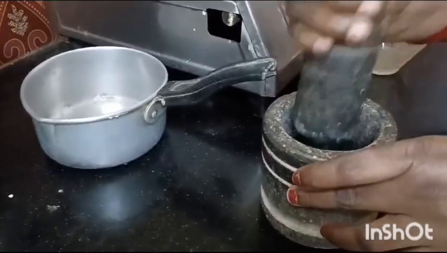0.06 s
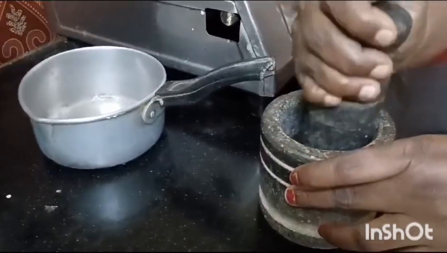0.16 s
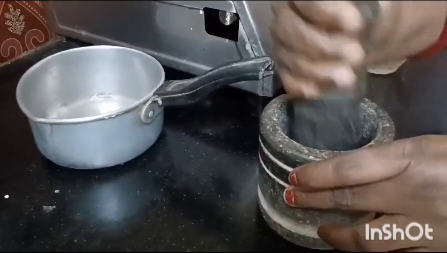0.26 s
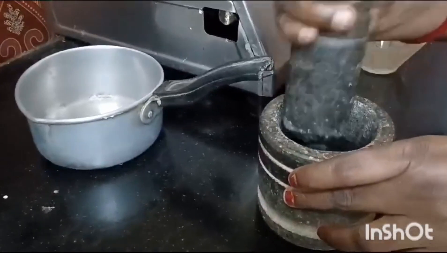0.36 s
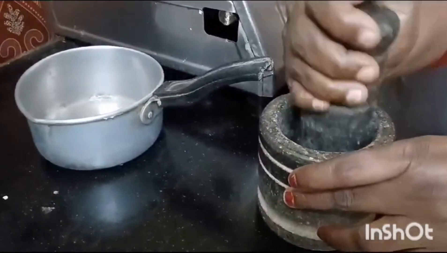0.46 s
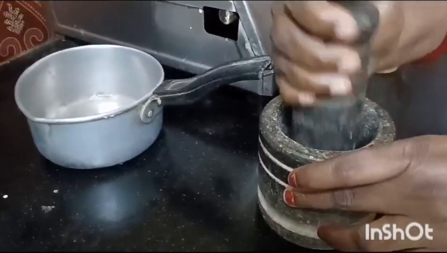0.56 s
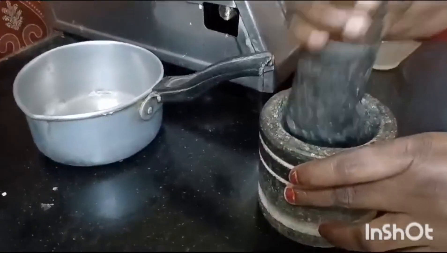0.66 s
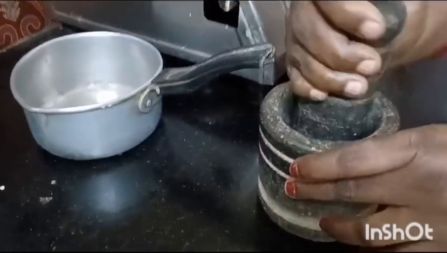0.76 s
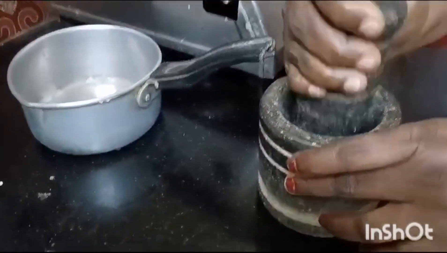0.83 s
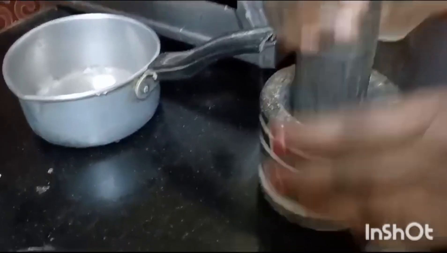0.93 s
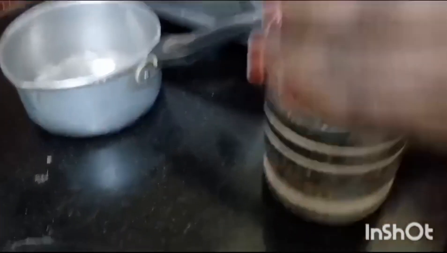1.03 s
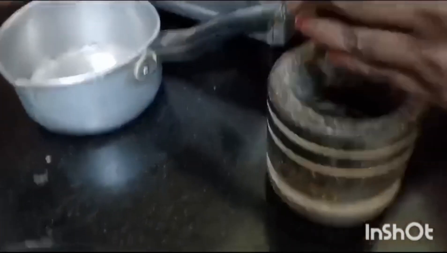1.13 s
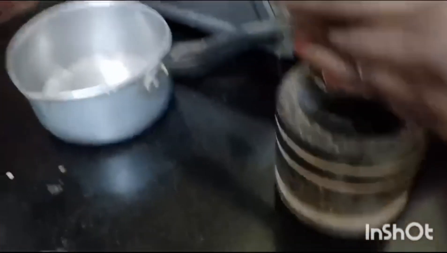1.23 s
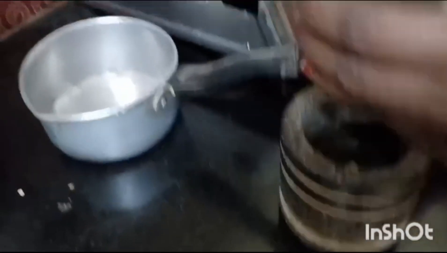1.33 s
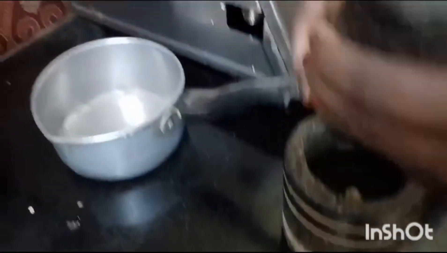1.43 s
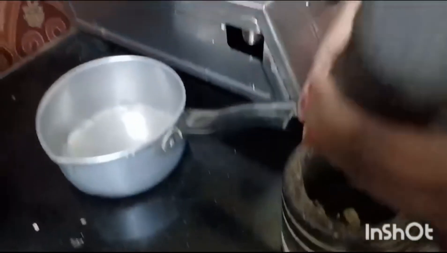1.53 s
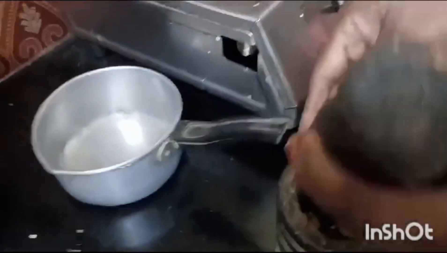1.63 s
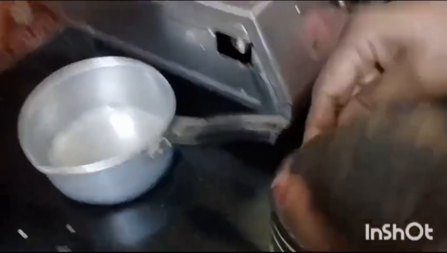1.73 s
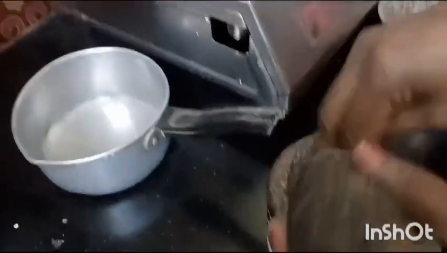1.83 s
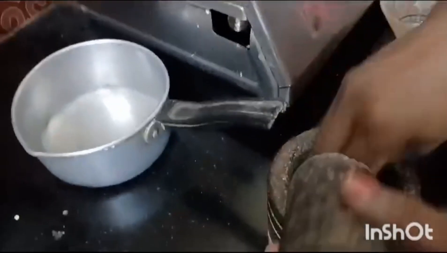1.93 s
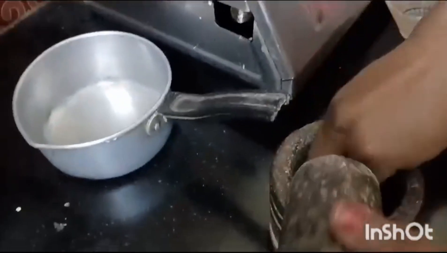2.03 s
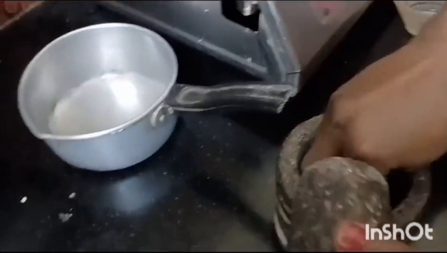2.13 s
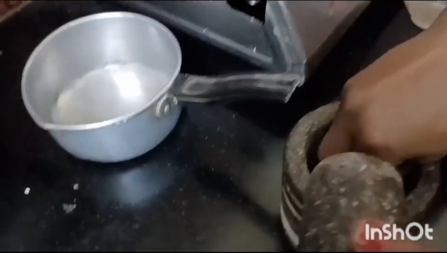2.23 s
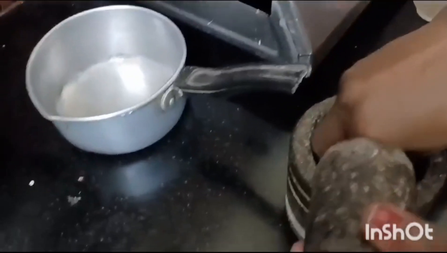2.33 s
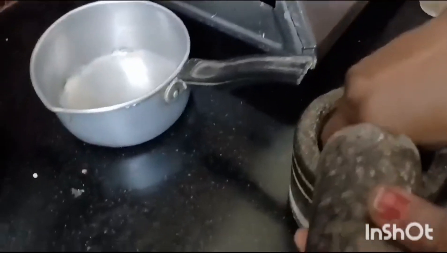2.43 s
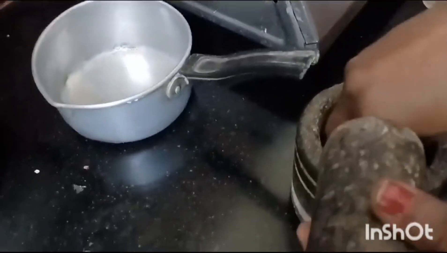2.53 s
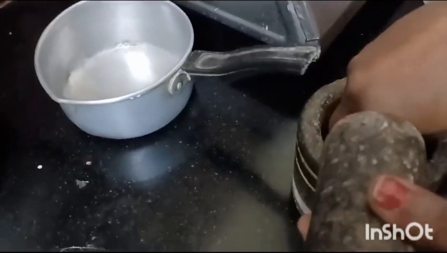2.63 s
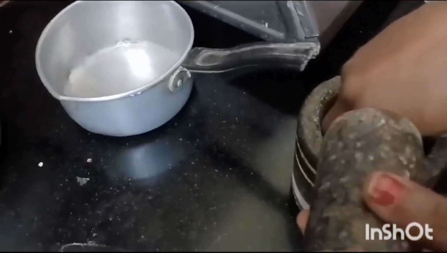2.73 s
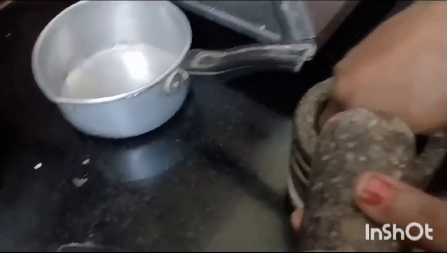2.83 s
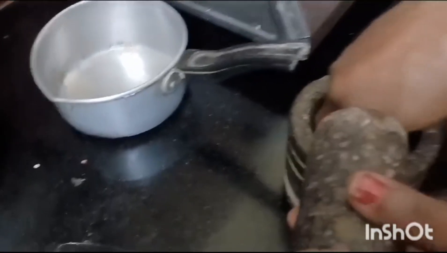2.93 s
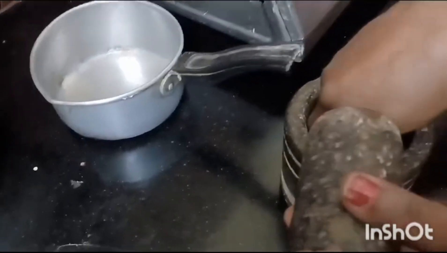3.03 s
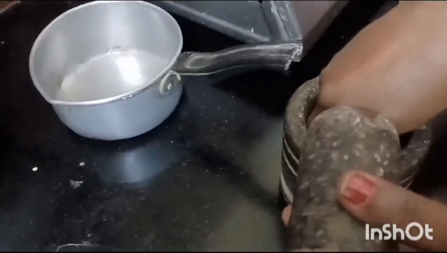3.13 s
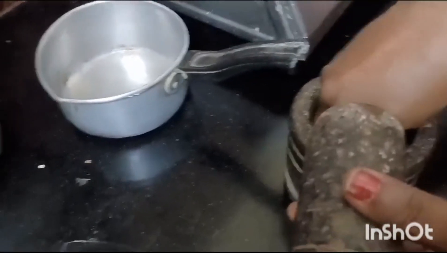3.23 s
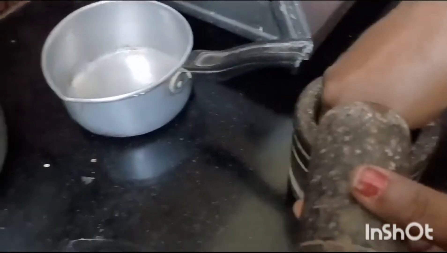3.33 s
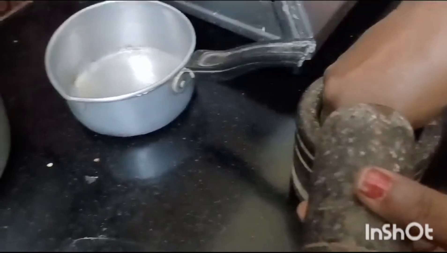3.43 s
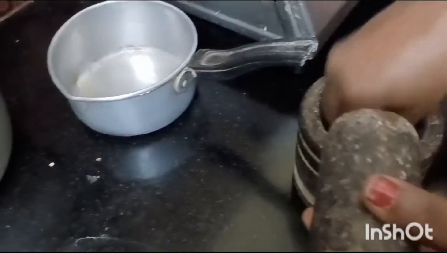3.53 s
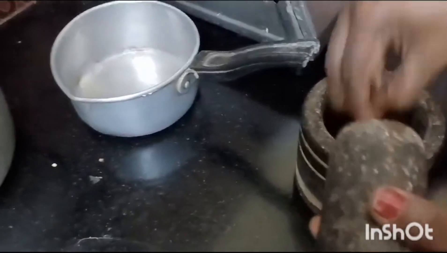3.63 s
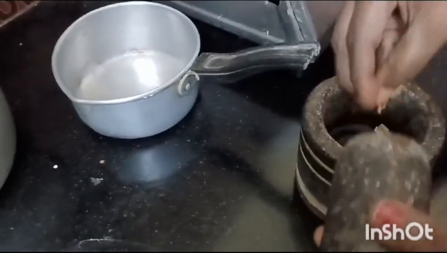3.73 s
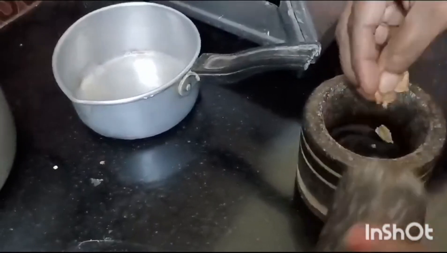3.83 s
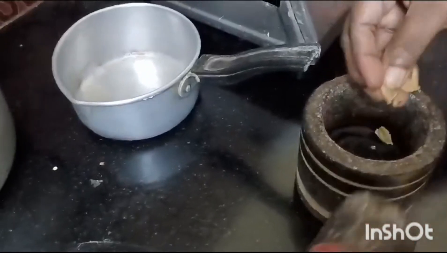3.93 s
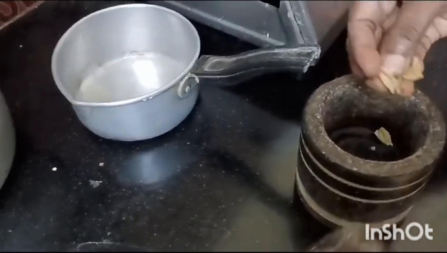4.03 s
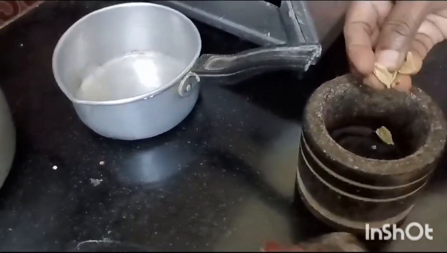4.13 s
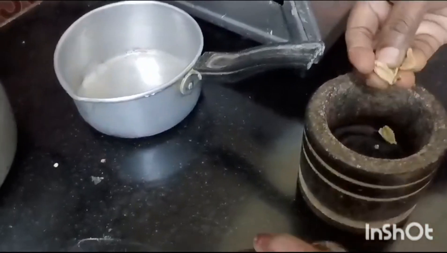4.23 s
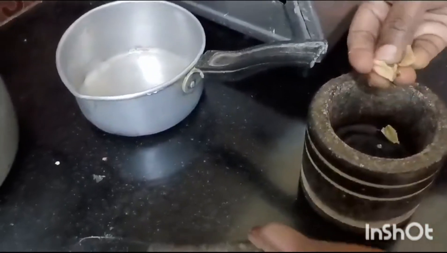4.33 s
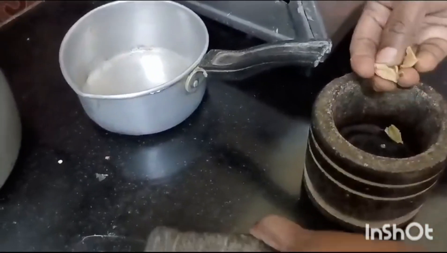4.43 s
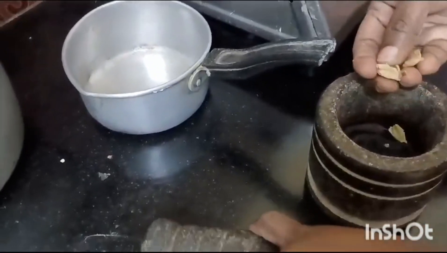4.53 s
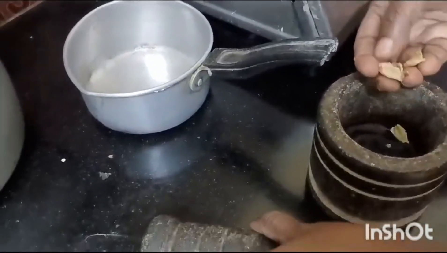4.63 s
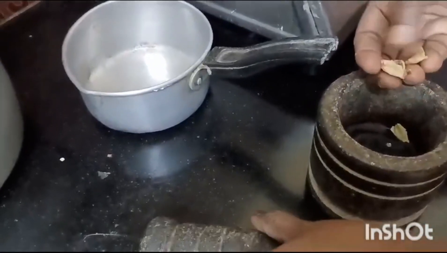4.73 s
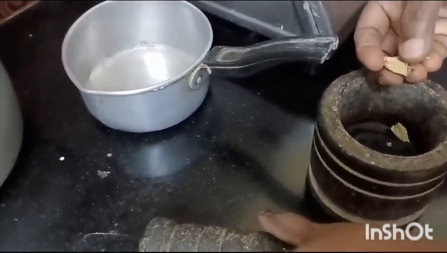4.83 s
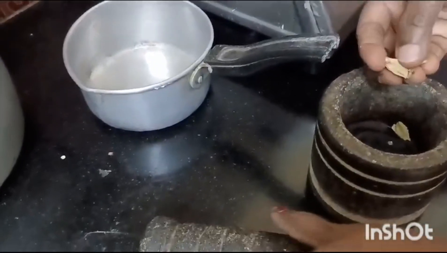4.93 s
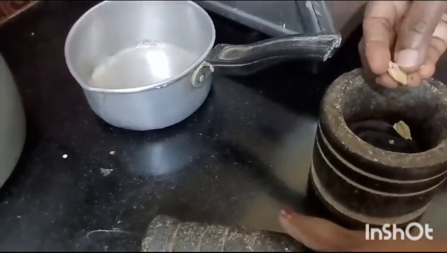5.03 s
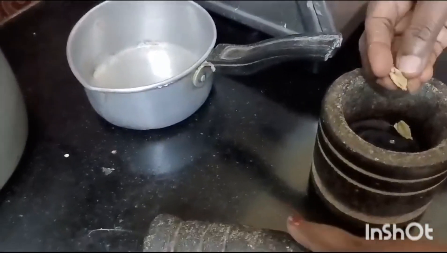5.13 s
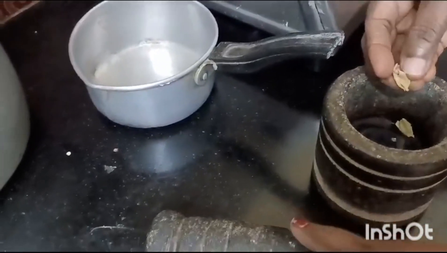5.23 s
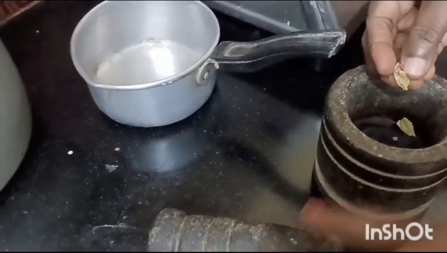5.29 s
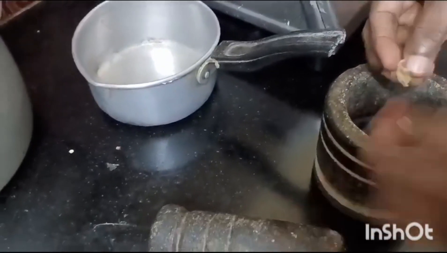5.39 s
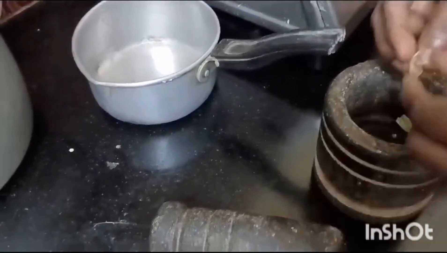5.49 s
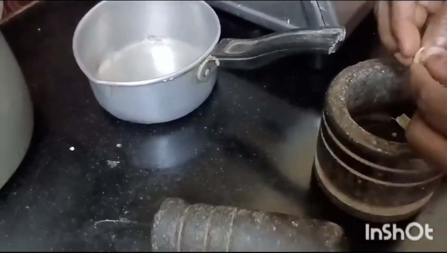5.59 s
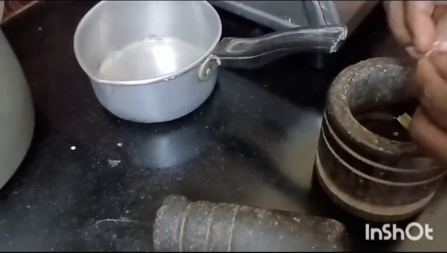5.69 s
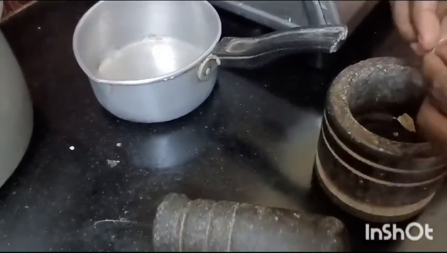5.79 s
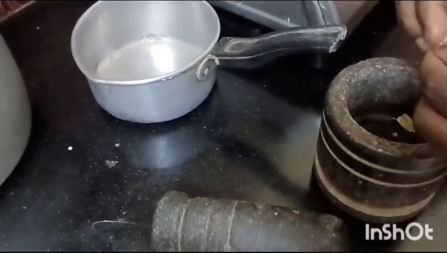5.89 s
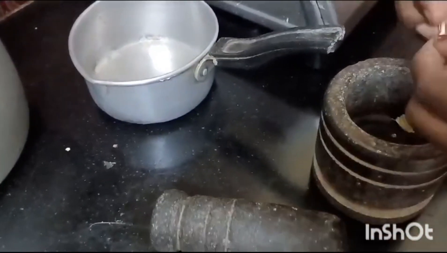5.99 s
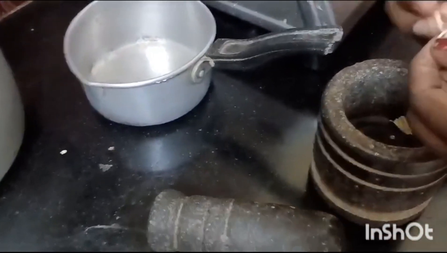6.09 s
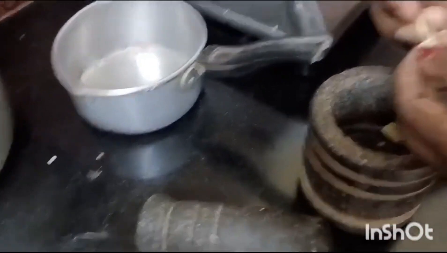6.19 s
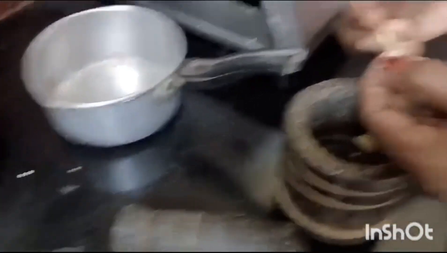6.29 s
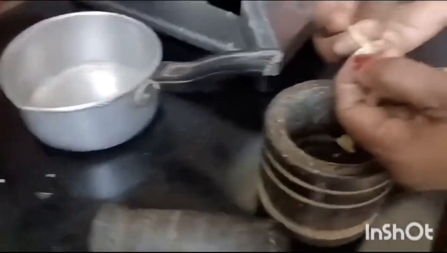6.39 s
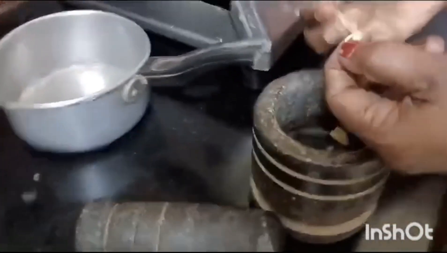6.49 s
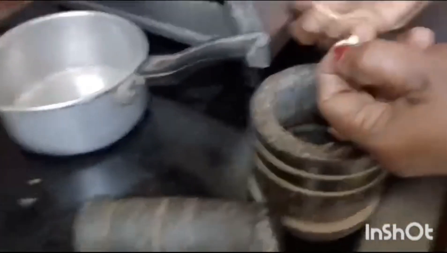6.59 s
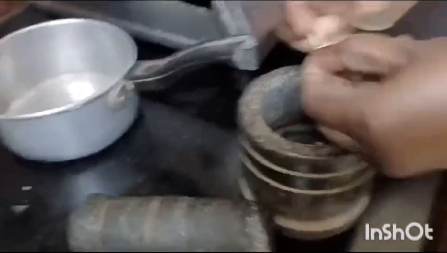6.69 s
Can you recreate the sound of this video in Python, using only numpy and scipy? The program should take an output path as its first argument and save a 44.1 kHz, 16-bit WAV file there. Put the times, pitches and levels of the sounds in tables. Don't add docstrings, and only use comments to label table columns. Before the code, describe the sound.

Three hard stone pestle blows ring in a bare kitchen with a singing metal pan, then dry rustling, bangle clinks and a pestle clacking down.

```python
import sys
import numpy as np
from scipy import signal
from scipy.io import wavfile
from scipy.ndimage import uniform_filter1d

SR = 44100
rng = np.random.default_rng(int(sys.argv[2]) if len(sys.argv) > 2 else 0)


def persist_wave(psi):
    counts = np.round(np.clip(psi, -1, 1) * 32767).astype(np.int16)
    wavfile.write(sys.argv[1], SR, np.atleast_2d(counts).T)


def ratio_of_db(decibels):
    return 10 ** (np.asarray(decibels, float) / 20)


N = 297675
LEAD = SR // 4
BAND_EDGES_HZ = 36 * 2 ** np.arange(0, 9.1, 1 / 3)


def rms_one(x):
    return x / np.sqrt(np.mean(x ** 2) + 1e-30)


def at_hz(points, hz):
    table_hz, value = np.array(points)[:, 0], np.array(points)[:, 1]
    return np.interp(np.log(hz), np.log(table_hz), value)


def cut(x, hz, kind, order):
    sos = signal.butter(order, np.clip(hz, 20, 18000), kind, fs=SR, output="sos")
    return signal.sosfilt(sos, x)


def clicks(times, sizes):
    out = np.full(N + LEAD, 1e-18)
    np.add.at(out, np.round(np.asarray(times) * SR).astype(int) + LEAD, sizes)
    return out


def ring(x, hz, t60):
    r, w = ratio_of_db(-60 / (t60 * SR)), 2 * np.pi * hz / SR
    return signal.lfilter([0, np.sin(w)], [1, -2 * r * np.cos(w), r * r], x)


def struck(events, modes, hold=1, swell_s=1e-4):
    s, db = np.array(events)[:, 0], np.array(events)[:, 1]
    luck_db, out = 2 * rng.standard_normal((len(s), len(modes))), 0
    for k, (hz, level_db, t60) in enumerate(modes):
        hit = clicks(s, ratio_of_db(db + level_db + luck_db[:, k]))
        mode = ring(hit, hz, t60 * hold)
        if swell_s > .001:
            mode = mode - ring(hit, hz, swell_s)
        out = out + mode * (-1) ** k
    return out


def contacts(events):
    out, luck = np.zeros(N + LEAD), rng.random((len(events), 2))
    for (s, db, hz), (wait, size) in zip(events, luck):
        tap = np.zeros(SR // 50)
        tap[0] = 1
        tap[40 + int(130 * wait)] = .25 * (2 * size - 1)
        at = round(s * SR) + LEAD
        out[at:at + len(tap)] += ratio_of_db(db) * cut(tap, hz, "low", order=2)[:len(out) - at]
    return out


def strokes(rows, rise_db_s, fall_db_s):
    t = (np.arange(N + LEAD) - LEAD) / SR
    out = 0
    for s, hold, db, *_ in rows:
        before, after = np.maximum(s - t, 0), np.maximum(t - s - hold, 0)
        out = out + ratio_of_db(db - rise_db_s * before - fall_db_s * after)
    return out


def whistle(hz, width_hz):
    sos = signal.butter(2, width_hz, fs=SR, output="sos")
    slow = signal.sosfilt(sos, rng.standard_normal((2, 2, N + LEAD)))
    phase = 2 * np.pi * np.cumsum(hz * np.ones(N + LEAD)) / SR
    return rms_one(slow[0] * np.cos(phase) + slow[1] * np.sin(phase))


# pitch_hz, likeness (0 to 1)
SIDE_LIKENESS = [(60, 0.35), (125, 1), (250, 0.59), (400, 0.49), (600, 0.31), (1000, 0.064), (4000, 0.51),
                 (12000, 0)]


def bands(size):
    white = rng.standard_normal((2, 2, size))
    centres = np.sqrt(BAND_EDGES_HZ[1:] * BAND_EDGES_HZ[:-1])
    out = np.empty((len(centres), 2, size))
    for k, hz in enumerate(centres):
        sos = signal.butter(2, BAND_EDGES_HZ[k:k + 2], "band", fs=SR, output="sos")
        mid, side = signal.sosfilt(sos, white[k % 2])
        alike = np.clip(at_hz(SIDE_LIKENESS, hz), 0, 1)
        out[k] = np.sqrt(1 + alike) * mid + np.sqrt(1 - alike) * side * np.array([[1], [-1]])
    return centres, out


# pitch_hz, left_minus_right_db
SIDE_LEAN = [(60, 1), (150, 2), (380, -1), (950, -0.5), (2380, 2), (5980, 5.5), (15000, -13)]


def coloured(bank, colour):
    centres, noise = bank
    lean_db = at_hz(SIDE_LEAN, centres)[:, None] * np.array([.5, -.5])
    return np.einsum("bc,bct->ct", ratio_of_db(at_hz(colour, centres)[:, None] + lean_db), noise)


# pitch_hz, t60_s
KITCHEN_DECAY = [(60, 2), (160, 1.5), (250, 1.1), (500, 1.1), (750, 1.254), (1100, 1.05), (2900, 0.68),
                 (7700, 0.17), (15000, 0.55)]


def kitchen():
    centres, noise = bands(SR * 3 // 2)
    t = np.arange(noise.shape[-1]) / SR
    decay = ratio_of_db(-60 * t / at_hz(KITCHEN_DECAY, centres)[:, None]) * (1 - np.exp(-t / 0.00047))
    return centres, noise * decay[:, None]


def reverb(x, room, colour, wet_db, fade_db=0, swell_s=1e-4):
    answer = coloured(room, colour)
    t = np.arange(answer.shape[1]) / SR
    early_rms = np.sqrt(np.mean(answer[:, :SR // 20] ** 2))
    answer = answer * ratio_of_db(-np.clip(fade_db, 0, 200) * t) * (1 - np.exp(-t / swell_s)) / early_rms
    return ratio_of_db(wet_db) * signal.fftconvolve(np.atleast_2d(x), answer, axes=1)[:, :N + LEAD]


# pitch_hz, level_db
AIR_COLOUR = [(18, -47), (30, -32), (142, -2.5), (378, -14.5), (480, -15.5), (835, -18.5), (1530, -26.5),
              (3570, -35.5), (5590, -31), (6900, -31), (13400, -36), (15200, -28), (16500, -45.5)]
# start_s, hold_s, level_db
HUSH = [
    (1.7, 0.35, 0.0035),
]


def still_air(bank):
    level_db = -72.5 - 5.5 * strokes(HUSH, 59.5, 900)
    return ratio_of_db(level_db) * rms_one(coloured(bank, AIR_COLOUR))


# start_s, hold_s, level_db
CHIRPS = [
    (5.81, 0.021, -71),
    (5.89, 0.021, -78),
    (5.94, .02, -85),
]
# start_s, hold_s, level_db
NAIL_SCRAPES = [
    (3.33, .04, -83),
]
# start_s, hold_s, level_db
FINGER_RUBS = [
    (3.03, 0.31, -79.5),
    (4.44, 0.23, -76),
]


def thin_whistles():
    chirp = strokes(CHIRPS, 245, 120) * whistle(4000, width_hz=120)
    scrape = strokes(NAIL_SCRAPES, 17.5, 154) * whistle(2600, width_hz=99)
    rub = strokes(FINGER_RUBS, 201, 100) * whistle(4800, width_hz=1300)
    whine = ratio_of_db(-94.5) * whistle(8110, width_hz=25)
    return chirp + scrape + rub + whine


# start_s, hold_s, level_db
WEIGHT_SHIFTS = [(2.2, .02, -89), (2.41, 0.025, -59), (2.78, 0.11, -60), (3.2, 0.19, -86),
                 (4.3, .13, -59.5), (4.6, 0.16, -56), (5.5, 0.064, -69), (6.05, 0.23, -80),
                 (6.27, 0.12, -69), (6.5, 0.36, -68)]


def slab_booms():
    return strokes(WEIGHT_SHIFTS, 132, 124.5) * cut(whistle(76, width_hz=74)[0], 55, "high", order=2)


# start_s, hold_s, level_db
DRAGS = [(1.86, 0.054, -79), (2.18, 0.068, -70), (2.38, 0.026, -66), (2.5, 0.18, -73.5), (2.75, 0.12, -56),
         (3.0, 0.15, -65.5), (3.2, 0.21, -62.5), (3.77, 0.09, -60.5), (3.97, 0.096, -69), (4.15, 0.26, -70)]
# pitch_hz, level_db
DRAG_COLOUR = [(24, -55), (40, -23), (85, -5.5), (147, 1.5), (200, -2), (308, -7), (658, -35), (802, -23.5),
               (1540, -52), (2550, -42), (3000, -45), (3900, -83), (6600, -120)]


def drags(bank):
    rumble = rms_one(coloured(bank, DRAG_COLOUR)) * ratio_of_db(-6.0)
    hum = whistle(147, width_hz=6.6)[0] * ratio_of_db(-1.0)
    return strokes(DRAGS, 215, 125) * (rumble + hum)


# start_s, hold_s, level_db, pitch_hz
SQUEALS = [(1.743, 0.046, -78, 830), (2.2, .12, -83, 830), (3.03, 0.19, -76.5, 530),
           (3.294, 0.089, -73, 550), (3.726, 0.078, -83, 690), (3.905, 0.2, -73, 660),
           (4.292, 0.15, -72, 560)]


def squeals():
    start, hold, _, pitch_hz = np.transpose(SQUEALS)
    turn = ((start + hold)[:-1] + start[1:]) / 2
    squeal_hz = pitch_hz[np.searchsorted(turn, (np.arange(N + LEAD) - LEAD) / SR)]
    return strokes(SQUEALS, 246, 246) * whistle(squeal_hz, width_hz=30)


def background():
    bank = bands(N + LEAD)
    return drags(bank) + slab_booms() + squeals() + thin_whistles() + still_air(bank)


# start_s, level_db, pitch_hz
TICKS = [(2.161, -54, 3000), (2.168, -58, 3000), (2.185, -51, 3200), (2.194, -50, 3200), (2.2, -60, 3200),
         (2.213, -56, 3000), (2.232, -52, 2800), (2.242, -62, 3000), (1.475, -57, 3500), (2.554, -56, 5800),
         (2.562, -64, 5800), (2.743, -65, 5800), (3.461, -65, 5600), (4.4265, -64, 8600),
         (4.558, -57, 7700), (5.9656, -57, 13500), (5.9725, -54, 13400), (5.981, -51, 13500),
         (6.0265, -48, 13500), (6.048, -62, 9000), (6.079, -57, 14500), (6.088, -44.5, 5760),
         (6.203, -47, 8300), (6.345, -63, 3035), (6.447, -64.5, 2990), (6.5135, -61, 7100),
         (6.5135, -55, 14500), (6.52, -59, 14000), (6.715, -56, 13000), (6.575, -50.5, 2900),
         (6.6919, -53, 5700), (6.7179, -54.5, 3150)]


def ticks():
    out, size = np.zeros((2, N + LEAD)), SR // 50
    fade = np.exp(-np.arange(size) / (.0012 * SR))
    bursts = rng.standard_normal((len(TICKS), 2, size)) * fade
    for (s, db, hz), burst in zip(TICKS, bursts):
        band = cut(cut(burst, hz * .85, "high", order=4), hz * 1.18, "low", order=3)
        at = round(s * SR) + LEAD
        out[:, at:at + size] += ratio_of_db(db) * band / np.abs(band).max()
    return out


# start_s, level_db
SNAPS = [(1.475, -59.5), (1.997, -48), (2.099, -44), (2.101, -48), (2.107, -56), (2.1131, -37.5),
         (2.119, -42), (2.118, -46), (2.14, -45), (2.153, -41), (2.16, -31), (2.166, -33), (2.1817, -33),
         (2.1833, -30), (2.1885, -27), (2.195, -34), (2.199, -52), (2.212, -34), (2.232, -44),
         (2.4015, -46), (2.5266, -53.5), (2.5524, -37.5), (2.561, -52), (2.5773, -58), (2.6397, -55.5),
         (2.7412, -43), (2.744, -45.5), (2.7836, -43.5), (3.408, -51), (3.461, -46), (6.024, -58.5),
         (6.0491, -65.5), (6.0885, -39), (6.345, -63), (6.513, -46.5), (6.574, -50), (6.6918, -49),
         (6.716, -40), (6.746, -42)]
# start_s, hold_s, level_db
STIRS = [(1.12, 0.087, -78), (1.55, 0.099, -79.5), (4.15, 0.059, -85.5), (2.0, 0.0081, -68.5),
         (2.115, 0.047, -63.5), (2.28, 0.0092, -82), (2.40, 0.052, -69.5), (2.53, 0.025, -64),
         (2.74, .05, -68), (3.33, 0.11, -80), (3.46, .01, -71.5), (5.9, 0.12, -77), (6.06, 0.061, -73.5),
         (6.2, 0.0095, -74.5), (6.518, 0.015, -68.5), (6.70, 0.033, -67)]
# pitch_hz, level_db
POD_COLOUR = [(880, -53), (1500, -39), (1910, -46), (3150, -5), (3660, -29), (4300, -2.5), (5930, -2),
              (8170, -5), (13600, -6), (15900, 9), (16500, -7)]


def pods(room):
    s, db = np.transpose(SNAPS)
    snaps = signal.lfilter([1], [1, -np.exp(-1 / (0.0023 * SR))], clicks(s, ratio_of_db(db - 10.5)))
    falls = rng.random(N + LEAD) < 3000.0 / SR
    grains = falls * ratio_of_db(1.2 * np.minimum(rng.exponential(1, N + LEAD), 4))
    rustle = rms_one(grains) * strokes(STIRS, 902, 187) * ratio_of_db(3.0)
    touch = (snaps + rustle) * rng.standard_normal(N + LEAD)
    bowl = coloured(room, POD_COLOUR)[:, :512] * np.exp(-np.arange(512) / 26.0)
    bowl = bowl / np.sqrt(np.sum(bowl ** 2) / 2)
    dry = signal.fftconvolve(touch[None], bowl, axes=1)[:, :N + LEAD]
    return dry + reverb(touch, room, POD_COLOUR, wet_db=-43.0)


# start_s, level_db, pitch_hz, t60_s
LONE_HOOPS = [(1.283, -50, 13370, .07), (1.284, -54, 8340, .08), (5.004, -76, 13420, .05),
              (5.188, -66, 13430, .07), (5.476, -29, 13440, .09), (5.4615, -44, 5039, .06),
              (2.279, -62, 13430, .06), (2.279, -66, 8340, .1), (4.678, -76, 13430, .08),
              (1.275, -52, 4996, .035), (5.789, -67, 13430, .07)]


def lone_hoops():
    out = 0
    for s, db, hz, t60 in LONE_HOOPS:
        out = out + cut(ring(clicks([s], ratio_of_db(db)), hz, t60), hz * .7, "high", order=4)
    return ratio_of_db([[-12.0], [3.0]]) * out


# start_s, level_db, left_minus_right_db
CLINKS = [
    [(.955, -57, -18.5), (.98, -64, -15), (1.221, -59, -24), (1.2352, -39, -21.5), (1.2375, -43, -14.5),
     (1.241, -49, -17), (1.2475, -52, -11), (1.2742, -34, -4), (1.279, -37, -7), (1.294, -51, 2),
     (2.278, -58, -17)],
    [(5.422, -49, -32), (5.4256, -31.5, -20), (5.4285, -36.5, -31.5), (5.4305, -32, -19), (5.4345, -38, -6),
     (5.4375, -42, -16), (5.444, -62, -14), (5.4606, -27, -16.5), (5.462, -34, -14), (5.4658, -26, -16.5),
     (5.4695, -37, -16), (5.4718, -27.5, -11), (5.476, -44.5, -15), (5.7885, -54, -10), (5.80, -63.5, -31),
     (5.966, -66, -25), (6.203, -66.5, -7.5), (6.514, -74.5, -1)],
    [(5.0298, -50, -12), (5.0355, -61, -10), (5.039, -68, -13), (5.044, -43, -14), (5.156, -67, -12)],
]
# pitch_hz, level_db, t60_s
HOOPS = [
    [(4150, -20, .015), (4996, -22.0, .02), (8339, -12.0, .045), (8823, -18.0, .015), (9528, -14.0, .015),
     (11060, -18.0, .012), (12280, -2.0, .022), (12580, -8.0, .02), (13370, -10.0, .03),
     (14150, -10.0, .012), (15050, -8.0, .014)],
    [(4300, -26.0, .01), (5039, -25.0, .025), (7628, -20.0, .01), (8333, -14.0, .014), (9534, -21.0, .02),
     (11260, -17.0, .008), (12330, -6.0, .012), (12620, -2.0, .02), (12950, -10.0, .01), (13440, -9.0, .03),
     (15190, -7.0, .012), (15300, -5.0, .018)],
    [(4250, -22, .012), (4400, -21, .02), (5800, -19, .012), (7800, -12, .012), (8330, -8, .025),
     (10900, -8, .008), (12300, -5, .03), (12750, -4, .02), (13400, -9, .03), (14600, -10, .008),
     (15800, -8, .006)],
]
# pitch_hz, level_db
CLINK_COLOUR = [(1500, 6), (3300, -1), (4000, 10), (5200, 11.5), (6000, -9), (7000, -24), (7700, 14),
                (10000, 2.5), (12600, -3), (15600, -2), (16100, -13.5)]


def bangles(clinks, hoops, room):
    s, db, lean_db = np.transpose(clinks)
    luck = rng.standard_normal((len(s), len(hoops), 2, 2))
    sides_db, rings = np.array([lean_db / 2, -lean_db / 2]), 0
    for k, (hz, level_db, t60) in enumerate(hoops):
        size = ratio_of_db(db + sides_db + level_db + 2.5 + 4.7 * luck[:, k, 0].T)
        size = size * np.sign(luck[:, k, 1].T)
        rings = rings + ring(np.array([clicks(s, side) for side in size]), hz, t60 * 0.98)
    tick = np.array([clicks(s, ratio_of_db(db + side)) for side in sides_db])
    rattle = signal.lfilter([1], [1, -np.exp(-1 / (0.00086 * SR))], tick)
    rattle = rattle * rng.standard_normal(tick.shape) * ratio_of_db(-11.5)
    near = cut(rings + cut(rattle, 13000, "high", order=1), 4200, "high", order=4)
    both = rattle.sum(axis=0)
    spray = ratio_of_db(14.0) * cut(both, 5660, "high", order=4) + ratio_of_db(-6.5) * cut(both, 1200, "high", order=2)
    walls = reverb(near.sum(axis=0) + spray, room, CLINK_COLOUR, wet_db=-48.5) * ratio_of_db([[-5.0], [3.0]])
    body = ratio_of_db(-19.0) * cut(cut(rattle, 2900, "low", order=2), 710, "high", order=2)
    return near + walls + body


# start_s, level_db
TILTS = [
    (6.046, -40.5),
    (6.075, -41.5),
    (6.15, -47.5),
]
# pitch_hz, level_db, t60_s
FREE_BOWL = [(230, -4, 0.56), (365, 2.5, 0.16), (950, -18.5, 0.26), (1450, -17, 0.079), (1900, -27, 0.16)]


def tilted_mortar():
    return cut(struck(TILTS, FREE_BOWL), 1500, "low", order=1)


# pitch_hz, level_db, t60_s
SLAB = [(73.5, -20.5, 1.5), (95.57, -20.5, 1.2), (154, -24.5, 1.85), (172.3, -14.5, 0.5),
        (230.8, -8.5, 0.88), (261.3, -4, 0.23), (329.6, -7, 0.43), (375, -16.5, 1), (431.3, -8, 0.21),
        (480.4, -12, 0.37), (590, -13.5, 1.2), (700, -20.5, 1.1), (736.6, -5.5, 0.3), (870, -5.5, .25)]


def knocks(events, body, colour, room, dry_db, slab_db, wet_db, fade_db, top_hz, leak_db):
    taps = contacts(events)
    dry = 0
    for k, (hz, db, t60) in enumerate(body):
        dry = dry + ratio_of_db(dry_db + db) * ring(taps + 1e-18, hz, t60) * (-1) ** k
    slab = ratio_of_db(slab_db) * cut(struck(events, SLAB, hold=0.079), 620, "low", order=1)
    heard = dry + slab + reverb(taps, room, colour, wet_db, fade_db, swell_s=0.0056)
    leak = ratio_of_db(leak_db) * cut(heard, 1.61 * top_hz, "low", order=4)
    return cut(heard, top_hz, "low", order=8) + leak


# start_s, level_db, brightness_hz
NUDGES = [(2.745, -57.5, 1345), (5.536, -64, 1800), (5.899, -42.5, 883), (5.920, -42, 700),
          (5.928, -39, 850), (5.956, -40.5, 890), (6.043, -37, 1490), (6.064, -39, 700), (6.082, -41, 1200),
          (6.148, -45.5, 880), (6.448, -31.5, 1680), (6.457, -40, 790), (6.478, -34.5, 1130),
          (6.525, -40, 930), (6.559, -39.5, 700), (6.576, -39, 1220), (6.62, -39, 700), (6.668, -35.5, 700),
          (6.675, -36.5, 816), (6.699, -37.5, 1100), (6.713, -40.5, 800), (6.733, -52, 700)]
# start_s, level_db, brightness_hz
SOFT_NUDGES = [(2.40, -86, 297), (4.303, -56, 300), (5.851, -52, 400), (6.209, -47, 500),
               (6.288, -49.5, 450), (6.349, -48, 397), (6.386, -56, 450), (6.404, -42, 454)]
# pitch_hz, level_db, t60_s
BOWL_FOOT = [(242, -19, 1), (361.6, -9.5, 0.14), (475, -2, 0.091), (552, -9, 0.14), (600, -4.5, 0.11),
             (956, -6.5, 0.057), (1547, -8.5, 0.03), (1970, -22.5, 0.058)]
# pitch_hz, level_db
NUDGE_COLOUR = [(26, -58), (45, -34), (86, -8.5), (201, -1.5), (231, -0.5), (323, -8), (371, 0), (595, -8),
                (800, -11), (1030, -10.5), (2190, -27), (5000, -8.5), (6500, -88), (11000, -120)]


def nudged_mortar(room):
    return knocks(NUDGES + SOFT_NUDGES, BOWL_FOOT, NUDGE_COLOUR, room, dry_db=-3.0, slab_db=-27.0,
                  wet_db=-8.5, fade_db=67.5, top_hz=2480, leak_db=-20.5)


# start_s, level_db, brightness_hz
LAID = [(4.4258, -13.5, 4660), (4.4375, -29, 2520), (4.441, -35, 2500), (4.4525, -21.5, 2500),
        (4.4745, -26, 700), (4.4905, -32, 890), (4.478, -30, 1190), (4.505, -22, 1180), (4.55, -15, 600),
        (4.595, -24, 1700), (4.607, -22, 600), (4.66, -36.5, 600)]
# pitch_hz, level_db, t60_s
PESTLE = [(224.4, -10, 0.85), (239, -8.5, 1), (472.5, -6, 0.62), (461, -16, .5), (582, -17, 0.04),
          (868, -13.5, 1), (952, -13.5, 0.6), (1060, 12.5, 0.0062), (1574, 21.5, 0.0042),
          (1960, 21.5, 0.0033), (3170, 12, 0.004), (3800, 4, 0.0019)]
# pitch_hz, level_db
LAID_COLOUR = [(45, -40), (65, -11), (123, -9.5), (226, -0.5), (328, -4.5), (466, -2), (800, -8),
               (1110, -6.5), (1890, -9), (3900, -22), (4500, -38), (6200, -17), (7500, -45), (16000, -77.5)]


def laid_pestle(room):
    return knocks(LAID, PESTLE, LAID_COLOUR, room, dry_db=-16.5, slab_db=-12.0,
                  wet_db=-17.5, fade_db=26.0, top_hz=4250, leak_db=-16.5)


# start_s, level_db, pitch_hz, t60_s
PAN_RINGS = [(-.1, -46.5, 3058, .4), (-.1, -42.5, 2961, 0.43), (-.1, -33, 1216, .3),
             (-.1, -50.5, 7880, 0.37), (0.147, -54.5, 14800, 0.18), (.147, -54.5, 12340, 0.2),
             (.452, -51, 4170, 0.095), (.455, -54.5, 15360, 0.1227), (.455, -57, 12080, 0.15)]
# start_s, hold_s, level_db
RIM = [(.16, 0.041, -46.5), (.24, 0.11, -55), (.458, .015, -42.5), (.478, 0.035, -35), (.54, 0.016, -45),
       (.57, .015, -53), (.6, .06, -50.5), (.67, .03, -58), (.76, .08, -52.5)]


def singing_pan():
    t = np.arange(N + LEAD) / SR
    pan = strokes(RIM, 2500, 500) * np.sin(2 * np.pi * 4297 * t)
    for s, db, hz, t60 in PAN_RINGS:
        pan = pan + cut(ring(clicks([s], ratio_of_db(db)), hz, t60), hz / 2, "high", order=2)
    return np.array([ratio_of_db(5.0) * pan, ratio_of_db(1.5) * np.roll(pan, 3)])


# start_s, hold_s, level_db
BUZZ = [
    (-0.064, 0.037, -46),
]


def buzzing_pan():
    narrow = whistle(2950, width_hz=220) * ratio_of_db(0.5)
    broad = cut(whistle(4000, width_hz=1800), 6200, "low", order=6) * ratio_of_db(-4.0)
    return strokes(BUZZ, 500, 69.5) * (narrow + broad)


# start_s, level_db
BLOWS = [
    (-.165, -9),
    (0.14078, -8.5),
    (0.44705, -8),
    (0.74915, -8),
]
# pitch_hz, level_db, t60_s, polarity
MORTAR = [
    [(358, 2, .03, 1), (560, -5, .03, 1), (1037, 8.5, .012, -1), (1188, -4, .03, 1), (1669, 2, .016, -1),
     (2945, -10, .006, -1)],
    [(365, 6, .013, 1), (551, 0, .03, -1), (824, -3, .03, -1), (1359, 3, .018, -1), (1705, -9.5, .02, -1),
     (2758, -11, .006, -1)],
]


def mortar_knock():
    s, force_db = np.transpose(BLOWS)
    luck_db = 0.7 * rng.standard_normal((len(s), 2, len(MORTAR[0])))
    knock = np.zeros((2, N + LEAD))
    for c, side in enumerate(MORTAR):
        for k, (hz, db, t60, sign) in enumerate(side):
            knock[c] += sign * ring(clicks(s, ratio_of_db(force_db + db + luck_db[:, c, k])), hz, t60)
    return ratio_of_db(0.5) * cut(knock, 2800, "low", order=4)


def pounded_slab():
    twins = [(hz * 1.022, db - 9.0, t60) for hz, db, t60 in SLAB]
    boom = struck(BLOWS, SLAB + twins, swell_s=.06)
    return signal.lfilter([.03], [1, -.97], boom) * ratio_of_db(4.5) * ratio_of_db([[1.0], [-1.0]])


# delay_s, level_db
EARLY = [
    (.0092, -1.5),
    (0.0132, -9.5),
    (.023, -8.5),
    (0.035, -10),
    (0.039, -6),
]
# pitch_hz, level_db
BLOW_COLOUR = [(26, -49.5), (45, -17.5), (86, -7.5), (124, -15), (236, 0), (280, -11.5), (340, -7),
               (546, -10.5), (830, -12.5), (1050, -15.5), (1450, -20), (2000, -28), (3390, -37.5),
               (4450, -36), (4800, -32.5), (8060, -61.5), (15300, -45.5), (16500, -54)]


def pounding(room):
    hits = contacts([(s, db, 14000) for s, db in BLOWS])
    knock = mortar_knock()
    dull = cut(knock, 1000, "low", order=2)
    echoes = sum(ratio_of_db(db) * np.roll(dull, round(s * SR), axis=1) for s, db in EARLY)
    walls = cut(reverb(hits, room, BLOW_COLOUR, wet_db=-8.0, swell_s=.004), 250, "high", order=1)
    return knock + echoes + pounded_slab() + singing_pan() + buzzing_pan() + walls


def gate(x):
    power = uniform_filter1d(np.mean(x ** 2, axis=0), SR // 25)
    level_db = 10 * np.log10(np.maximum(power, 1e-14))
    return x * ratio_of_db(0.35 * np.minimum(level_db + 59, 0))


def scene():
    room = kitchen()
    stone = gate(pounding(room) + laid_pestle(room)) + nudged_mortar(room) + tilted_mortar()
    wrists = sum(bangles(clinks, hoops, room) for clinks, hoops in zip(CLINKS, HOOPS))
    hands = wrists + lone_hoops() + ticks() + pods(room)
    return (stone + hands + background())[:, LEAD:]


def roll_off(x):
    return signal.sosfilt(signal.butter(12, 16700, fs=SR, output="sos"), x)


def record(dry):
    headroom = 1.35
    low_cut = cut(dry, 56, "high", order=4)
    heard = signal.sosfilt(signal.cheby2(16, 40, 16150, fs=SR, output="sos"), low_cut)
    return roll_off(headroom * np.tanh(heard / headroom))


dry = scene()
out = record(dry)
persist_wave(out)
```